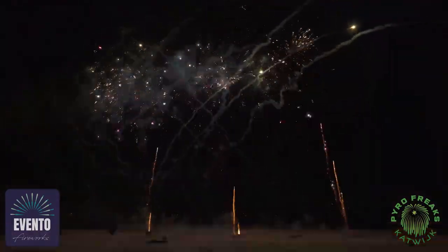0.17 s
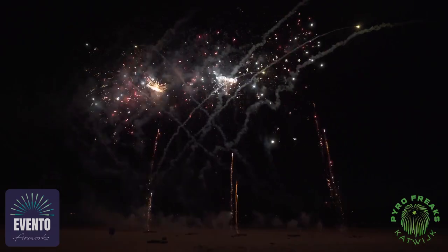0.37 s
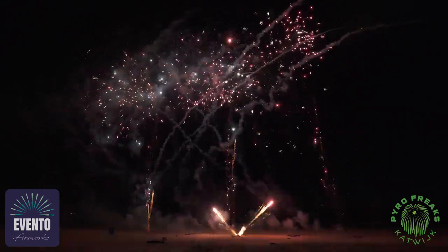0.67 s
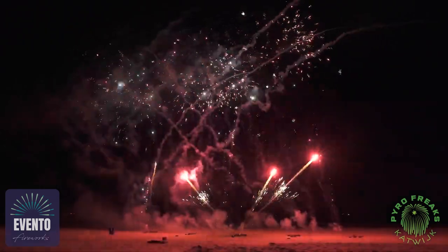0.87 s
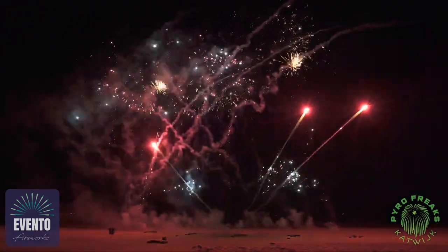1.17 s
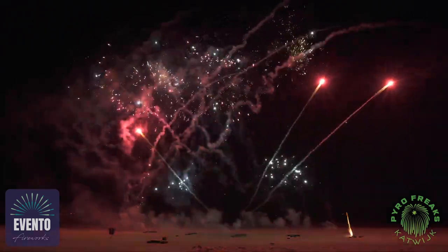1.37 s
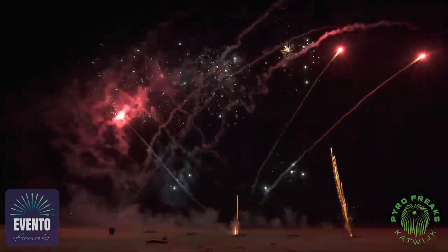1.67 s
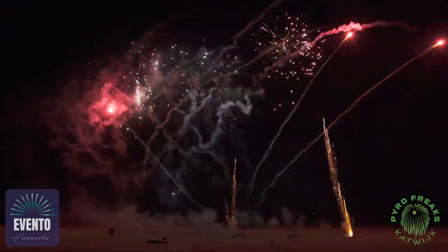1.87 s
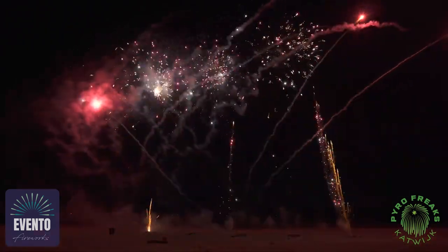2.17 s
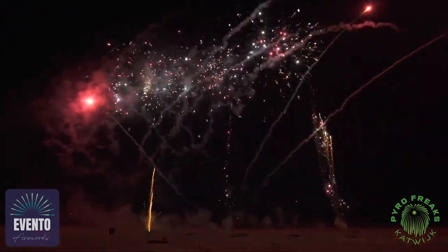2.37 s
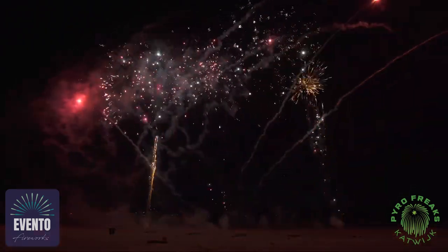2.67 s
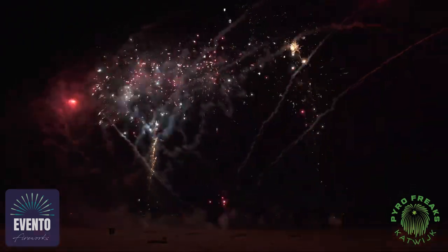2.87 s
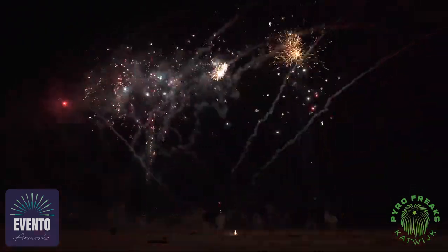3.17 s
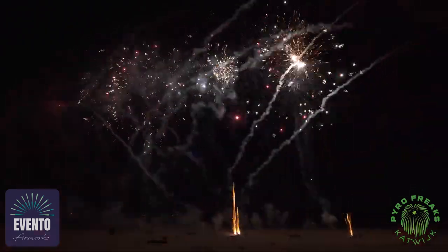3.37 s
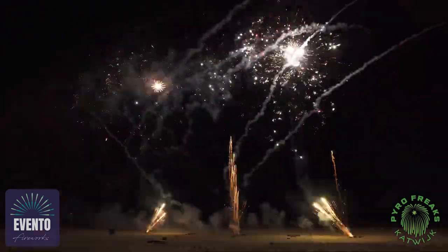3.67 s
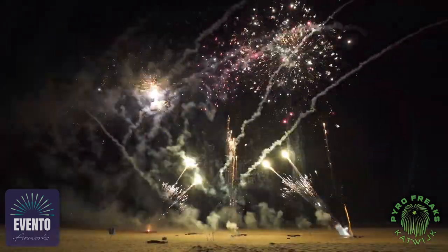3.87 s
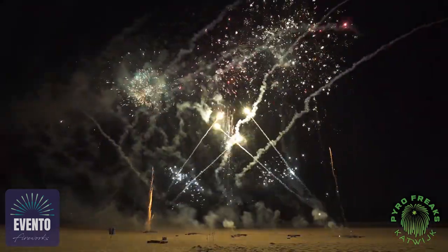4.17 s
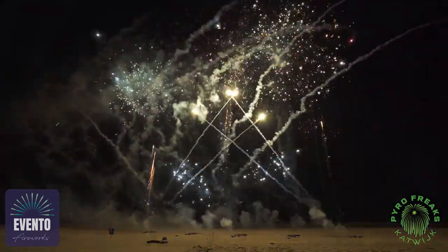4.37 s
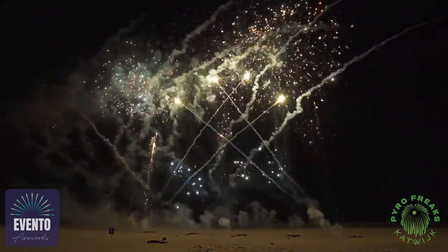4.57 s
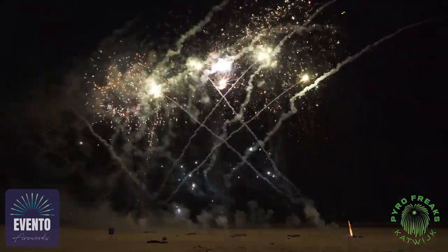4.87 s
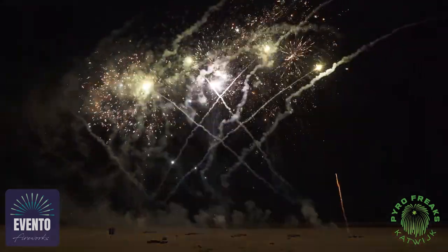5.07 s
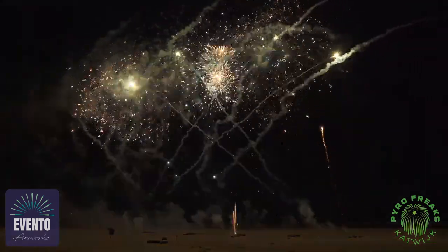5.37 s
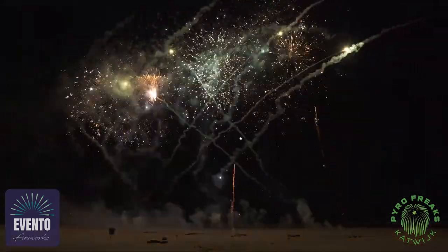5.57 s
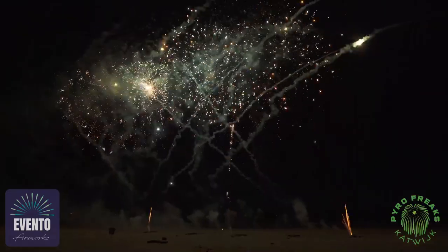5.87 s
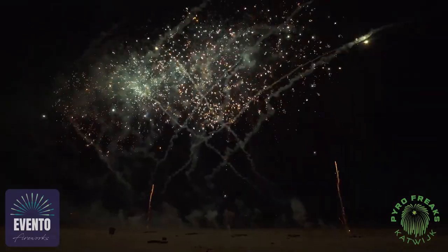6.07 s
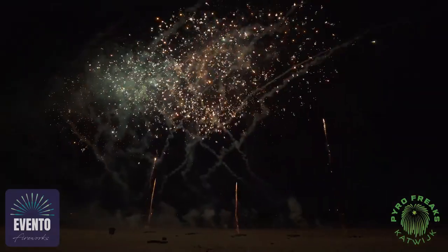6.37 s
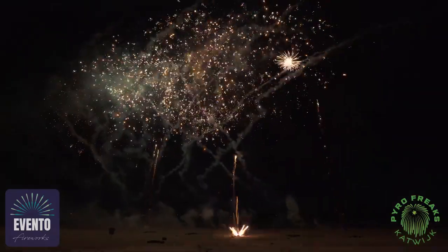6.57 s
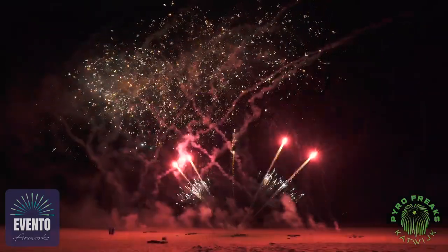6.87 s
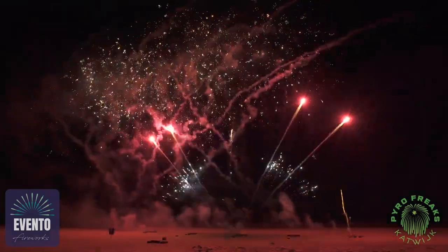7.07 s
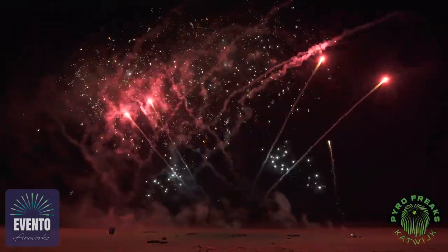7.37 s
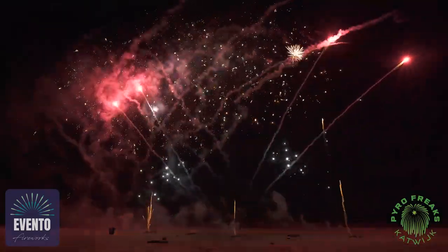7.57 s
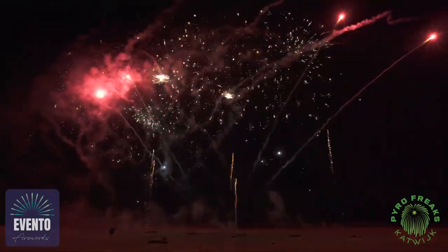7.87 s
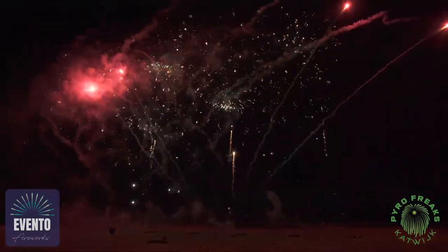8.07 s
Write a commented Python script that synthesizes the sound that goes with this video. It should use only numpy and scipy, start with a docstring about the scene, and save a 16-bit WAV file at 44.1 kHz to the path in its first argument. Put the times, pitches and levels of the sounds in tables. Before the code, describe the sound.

A night-time firework display outdoors, in wide stereo, begins over the fading roll of earlier shells. Three sharp bangs come within the first 0.25 s, then two near 0.5-0.65, with hollow tube thumps between. Ground mines crack and spit gas around 0.86-0.96. After a lull, bursts resume at 1.4 and scatter until 2.5, with runs of lift thumps. From 2.8, bangs on the right thicken into a dense barrage at 3.4-4.4, moving left, with loud mine cracks near 3.9. A lull follows until 5.06, then a rapid middle salvo shifts left and ends about 6.15. Mostly thumps and faint whistling remain until a loud burst and mines at 6.85-6.95. Another lull holds only soft thumps before bangs at 7.86, 7.92 and about 8.2. Each shock has a quick ground echo and long soft roll; faint fizz and air continue underneath.

```python
"""Sharp bangs of firework shells overhead come first, over the fading roll of earlier shells.
Each shell is a short shock wave, followed milliseconds later by its echo off the ground and scattered noise.
Three stations (left, middle, right) fire them: lift charges thump in their tubes, and mines crack and spit gas.
The surroundings return a long, soft roll. Sparks fizz and far whistles waver faintly in the night air.
"""
import sys
import numpy as np
from scipy import signal
from scipy.fft import rfft, irfft
from scipy.io import wavfile
from scipy.ndimage import uniform_filter1d

SR = 44100
rng = np.random.default_rng(int(sys.argv[2]) if len(sys.argv) > 2 else 0)


def bounce(signal):
    """Save signal as a 16-bit WAV file at the path given by the first command-line argument."""
    frames = np.transpose(np.atleast_2d(signal))
    limited = np.clip(frames, -1, 1)
    pcm = np.round(limited * 32767).astype(np.int16)
    wavfile.write(sys.argv[1], SR, pcm)


N = 363384
SIZE = 8192  # length of one short sound in samples
T = np.arange(SIZE) / SR  # time within a short sound, in seconds


def undb(db):
    """Turn decibels into a gain."""
    return 10 ** (np.asarray(db) / 20)


def add(track, start_s, sound):
    """Mix a stereo sound into the track at a time in seconds."""
    i = max(int(start_s * SR), 0)
    track[:, i:i + sound.shape[1]] += sound[:, :max(N - i, 0)]


def butter(x, hz, kind, order=2):
    """High-pass or low-pass filter that never acts before its input arrives."""
    sections = signal.butter(order, min(hz, SR / 2 - 1), kind, fs=SR, output="sos")
    return signal.sosfilt(sections, x)


def colour(x, points):
    """Shape the tone through (Hz, dB) points, without any sound ahead of its cause."""
    hz, db = np.transpose(points)
    bin_hz = np.arange(SIZE // 2 + 1) * SR / SIZE
    log_gain = np.interp(np.log(bin_hz + 1), np.log(hz), np.log(undb(db)))
    # folding the cepstrum forward in time makes the filter respond as early as it can
    cepstrum = irfft(log_gain)
    cepstrum[1:SIZE // 2] *= 2
    cepstrum[SIZE // 2 + 1:] = 0
    response = irfft(np.exp(rfft(cepstrum)))[:SIZE // 2]
    return signal.fftconvolve(x, response[None], axes=1)[:, :x.shape[1]]


def walk(rate_hz):
    """Slow random wander around zero: random steps at the given rate, smoothed twice."""
    step = int(SR / rate_hz)
    held = np.repeat(rng.standard_normal(N // step + 1), step)
    return uniform_filter1d(uniform_filter1d(held, step), step)[:N]


def grain(count, spread):
    """Noise made of separate reflections: each stretch of count samples has its own strength."""
    sizes = np.exp(spread * rng.standard_normal((2, SIZE // count + 1)))
    sizes = np.repeat(sizes, count, axis=1)[:, :SIZE] / np.exp(spread ** 2)
    return sizes * rng.standard_normal((2, SIZE))


def place(x, pan_db, front_hz=3400, leak=0.099):
    """Direction balances the body of a sound; its steep front reaches both channels in opposite phase."""
    body = butter(x, front_hz, "lowpass", order=1)
    front = x - body
    far = undb(-abs(pan_db)) - leak
    left, right = (1, far) if pan_db > 0 else (far, 1)
    return np.array([left * body - front, right * body + front])


# How wide diffuse sound is. Each row: frequency in Hz, gain of the channel difference in dB.
WIDTH = [(60, 10), (400, 11.5), (1500, 8), (4000, 8.5), (8000, 17), (13000, 22.5)]


def widen(x):
    """Spread diffuse sound wide: the channels are made to differ strongly, most of all in the treble."""
    mid = (x[0] + x[1]) / 2
    side = colour((x[:1] - x[1:]) / 2, WIDTH)[0]
    return np.array([mid + side, mid - side])


def whine(db=-57, pitch_hz=15734, throb_hz=11, depth=.4):
    """A thin, very high steady tone whose level is made to pulse quickly."""
    t = np.arange(N) / SR
    throb = 1 + depth * np.sin(2 * np.pi * throb_hz * t + .5 * walk(2))
    return undb(db) * throb * np.sin(2 * np.pi * pitch_hz * t)


# Tone of the outdoor air. Each row: frequency in Hz, gain in dB.
AIR_COLOUR = [(25, -1), (60, 13), (150, 17), (300, 2.5), (800, 9.5), (1500, 2.5), (3000, -21), (6000, -17),
              (10000, -31.5), (14000, -41)]


def night_air(db=-64):
    """A soft wash of outdoor noise, gently swelling; its level is set before widening."""
    air = colour(rng.standard_normal((2, N)), AIR_COLOUR)
    swell_db = 1.2 * walk(3)
    return air / air.std() * undb(db + swell_db)


# Tone of sound scattered by rough ground. Each row: frequency in Hz, gain in dB.
SCATTER_COLOUR = [(50, -16), (150, -3.5), (400, 2), (750, 1), (1200, -5), (2500, -10), (5000, -20),
                  (9000, -58), (14000, -40)]


def earlier_roll(db=-41, fade_s=0.054):
    """The roll of the shells that went off just before: fading noise."""
    wash = colour(rng.standard_normal((2, N)), SCATTER_COLOUR)
    fade = np.exp(-np.arange(N) / SR / fade_s)
    return wash / wash.std() * undb(db) * fade


# Faint far whistles. Each row: start in seconds, end in seconds, pitch at the start in Hz,
# pitch at the end in Hz, level in dB before flutter and widening.
WHISTLES = [(1.023, 1.364, 1153, 1030, -69.5), (6.197, 6.651, 845, 830, -63.5),
            (7.148, 7.723, 1078, 1047, -70)]


def whistles():
    """Thin, slightly wavering tones far off, arriving by several paths."""
    t, out = np.arange(N) / SR, np.zeros((2, N))
    for start_s, end_s, start_hz, end_hz, db in WHISTLES:
        part = np.clip((t - start_s) / (end_s - start_s), 0, 1)
        glide_hz = start_hz + (end_hz - start_hz) * part
        hz = glide_hz * (1 + 0.0033 * walk(60))
        # the right channel runs a quarter cycle ahead
        phase = 2 * np.pi * np.cumsum(hz) / SR + np.array([[0], [np.pi / 2]])
        flutter = undb(1.8 * np.array([walk(16), walk(25)]))
        rise_and_fall = 2 * np.sqrt(part * (1 - part))
        out += undb(db) * flutter * rise_and_fall * np.sin(phase)
    return out


# Tone of spitting gas and of sparks. Each row: frequency in Hz, gain in dB.
GAS_COLOUR = [(100, 1.5), (500, -7.5), (1500, 5.5), (3000, 5.5), (6000, -0.5), (10000, -11.5),
              (14000, -29.5)]


def sparks(db=-75, ticks_per_s=2500):
    """Burning stars fizz faintly overhead: a dense hiss of tiny ticks, a few of them larger."""
    fires = rng.random((2, N)) < ticks_per_s / SR
    sizes = undb(3.5 * np.minimum(rng.exponential(size=(2, N)), 6))
    ticks = colour(fires * sizes, GAS_COLOUR)
    return ticks / ticks.std() * undb(db + 2 * walk(2.2))


# Tone of the distant roll. Each row: frequency in Hz, gain in dB.
ROLL_COLOUR = [(30, -15), (100, -11.5), (250, -12), (500, -16.5), (800, -13.5), (1500, -12.5),
               (3000, -12.5), (6000, -25.5), (10000, -35), (14000, -31.5)]


def roll(x, t60_s=1.67, treble_t60_s=0.48, wet_db=-53):
    """Distant ground and buildings return a long, soft roll whose treble dies first."""
    t = np.arange(2 * SR) / SR
    noise = rng.standard_normal((2, len(t)))
    low = butter(noise, 2000, "lowpass", order=1)
    # each T60 is the time to fall by 60 dB
    tail = low * undb(-60 * t / t60_s) + (noise - low) * undb(-60 * t / treble_t60_s)
    # echoes build up quickly and come in uneven clumps
    build_up = (1 - np.exp(-t / 0.022)) * (1 + 5.0 * np.exp(-t / 0.023))
    clumps = undb(4.3 * walk(50)[:len(t)])
    response = colour(tail * build_up * clumps, ROLL_COLOUR)
    # both channels' sound returns from all round, whichever side fired
    from_left = signal.fftconvolve(x[:1], response, axes=1)
    from_right = signal.fftconvolve(x[1:], response[::-1] * np.array([[1], [-1]]), axes=1)
    return undb(wet_db) * (from_left + from_right)[:, :N]


def tube_thump(hz, damping):
    """Gas leaving a tube: a push, a suction and a small rebound."""
    cycles = hz * T
    return np.cos(2 * np.pi * cycles + damping / (2 * np.pi)) * np.exp(-damping * cycles)


# Lift charges, singly or in a run along the fuse. Each row: start in seconds,
# level in dB before the shaping of the shot, station, count of tubes.
CHARGES = [(0.175, -17.5, "right", 1), (0.279, -16.5, "right", 1), (0.4174, -21.5, "left", 1),
           (0.438, -20.5, "middle", 1), (0.7852, -22.5, "left", 1), (0.816, -20.5, "left", 1),
           (1.6055, -18, "right", 1), (1.6304, -21, "middle", 1), (1.67, -20, "right", 1),
           (1.6979, -17.5, "right", 4), (1.9462, -17, "middle", 1), (2.0988, -16.5, "right", 3),
           (2.3785, -21, "left", 1), (2.4457, -21.5, "left", 1), (2.5471, -22, "left", 3),
           (3.5182, -18.5, "middle", 1), (3.6073, -15.5, "right", 1), (3.753, -21, "middle", 1),
           (3.813, -22.5, "middle", 1), (4.0682, -17.5, "right", 1), (4.3409, -16, "left", 1),
           (4.3786, -20.5, "left", 1), (5.1337, -17.5, "right", 1), (6.0793, -19, "right", 1),
           (6.441, -19.5, "middle", 1), (6.4816, -19, "left", 1), (6.7195, -21.5, "middle", 1),
           (7.2036, -19, "right", 1), (7.6868, -19, "right", 1), (7.7349, -19, "right", 1),
           (7.7377, -17.5, "left", 1), (7.7977, -21.5, "left", 1), (7.905, -21.5, "middle", 1)]
# Faint lifts that patter on under thick salvos. Each row: start in seconds, end in seconds,
# level in dB before the shaping of the shot, station.
PATTER = [(3.57, 3.68, -22, "middle"), (4.281, 4.317, -24.5, "left")]


def lift_shots(fuse_s=.0435, patter_gap_s=0.015, patter_jitter_s=.002):
    """Every tube that fires: runs as the fuse burns from tube to tube, then the uneven patter."""
    shots = []
    for start_s, db, station, count in CHARGES:
        for k in range(count):
            shots.append((start_s + k * fuse_s, db, station))
    for start_s, end_s, db, station in PATTER:
        for s in np.arange(start_s, end_s, patter_gap_s):
            shots.append((s + patter_jitter_s * rng.standard_normal(), db, station))
    return shots


# The three firing positions. Each entry: left minus right in dB before leak and side adjustments,
# typical delay of the ground echo in milliseconds, typical pitch of the lift tube in Hz.
STATIONS = {"left": (8.1, 6.25, 200), "middle": (-4.5, 7.2, 193), "right": (-17, 7.45, 232)}


def lifts(damping=1.56, round_hz=600, thump_db=-1.5, crack_db=-2, spit_db=-15, tail_db=-35,
          wider=2.0, tube_spread=.06):
    """A small crack at the muzzle, a hollow thump and a spit of gas, further to the side than the burst."""
    thumps, spits = np.zeros((2, N)), np.zeros((2, N))
    for s, db, station in lift_shots():
        pan_db, _, tube_hz = STATIONS[station]
        hz = tube_hz * np.exp(tube_spread * rng.standard_normal())  # pitch differs from shot to shot
        thump = butter(tube_thump(hz, damping), round_hz, "lowpass", order=1)
        crack = np.exp(-T / .00005)
        wave = undb(thump_db) * thump + undb(crack_db) * crack
        add(thumps, s, undb(db) * place(wave, wider * pan_db))
        gas = undb(spit_db) * np.exp(-T / 0.0015) + undb(tail_db) * np.exp(-T / .015)
        add(spits, s, undb(db) * gas * rng.standard_normal((2, SIZE)))
    return thumps + widen(colour(spits, GAS_COLOUR))


# Mines throwing stars from the ground. Each row: start in seconds, level of the shot in dB
# before its shaping, station, level of the gas rush in dB before its shaping.
STAR_MINES = [(0.8586, -11, "middle", -20.5), (0.953, -21.5, "middle", -26), (0.9566, -11, "middle", -19.5),
              (3.473, -21.5, "left", -28), (3.8682, -10.5, "right", -25), (3.8711, -7.5, "right", -24.5),
              (3.9117, -14.5, "left", -28), (3.9199, -14, "left", -27.5), (6.8545, -15.5, "middle", -25.5),
              (6.8594, -9, "middle", -16.5)]


def mine_gas(rush_s=.0026, fizz_db=-20, fizz_s=0.009, stars_db=-37, ragged=.85):
    """A ragged rush of gas leaves each mine, fizzes briefly and ends in the hiss of its rising stars."""
    gas = np.zeros((2, N))
    lead_s = 0.0016  # gas already leaks just ahead of the crack
    rush = np.exp(-abs(T - lead_s) / rush_s)
    fizz = undb(fizz_db) * np.exp(-T / fizz_s)
    stars = undb(stars_db) * (1 - T / T[-1])
    for s, _, _, rush_db in STAR_MINES:
        ragged_noise = grain(count=16, spread=ragged)
        add(gas, s - lead_s, undb(rush_db) * (rush + fizz + stars) * ragged_noise)
    return widen(colour(gas, GAS_COLOUR))


def mines(tube_hz=110, damping=1.8, thump_db=-7, crack_db=0, echo_s=.0125, echo_db=-15):
    """A wide tube gives a deep, dead thump behind a sharp crack, and a weak slap off something near."""
    thumps = np.zeros((2, N))
    thump = butter(tube_thump(tube_hz, damping), 43, "highpass")
    crack = np.exp(-T / .00005)
    wave = undb(thump_db) * thump + undb(crack_db) * crack
    for s, db, station, _ in STAR_MINES:
        shot = place(wave, STATIONS[station][0])
        add(thumps, s, undb(db) * shot)
        add(thumps, s + echo_s, undb(db + echo_db) * shot)
    return thumps


def blast(push_ms, relax, low_hz):
    """Blast wave: an instant rise, a short push, then a longer suction; the deepest bass is lost."""
    age = T * 1000 / push_ms
    return butter((1 - age) * np.exp(-relax * age), low_hz, "highpass")


# Tone of the shock waves. Each row: frequency in Hz, gain in dB.
SHOCK_COLOUR = [(40, 3), (150, 1), (300, 2), (550, 5.5), (1000, 0), (2000, 2), (4000, 1), (8000, 7.5),
                (11000, 2), (14000, 5.5), (16500, 2)]
# Shells bursting overhead, singly and in salvos. Each row: start in seconds,
# level in dB before the shaping of the burst, station.
SHELLS = [(0.0816, 0, "left"), (0.1293, 0, "right"), (0.2207, 0, "middle"), (0.5204, -1.5, "middle"),
          (0.6538, -1, "left"), (1.393, 1, "right"), (1.4735, -1, "left"), (1.7182, 0, "middle"),
          (1.9645, 2, "right"), (2.0457, -1, "left"), (2.218, -0.5, "middle"), (2.343, -2, "left"),
          (2.5017, -2, "left"), (2.8406, 2.5, "right"), (3.1446, 2.5, "right"), (3.176, 1, "right"),
          (3.3971, 3.5, "right"), (3.4019, 1, "right"), (3.4439, -0.5, "middle"), (3.449, 2, "right"),
          (3.4805, -3.5, "middle"), (3.5435, 2.5, "right"), (3.6848, 3.5, "right"), (3.7015, 2, "right"),
          (3.7817, 1, "right"), (3.9596, 2, "right"), (3.9941, 1.5, "right"), (4.0062, -3.5, "left"),
          (4.112, -0.5, "left"), (4.1551, -4.5, "left"), (4.1594, -0.5, "left"), (4.1886, -0.5, "left"),
          (4.2439, -0.5, "left"), (4.3938, -1, "left"), (5.0631, 0.5, "middle"), (5.1555, 0, "middle"),
          (5.1893, -2.5, "middle"), (5.211, 1.5, "middle"), (5.226, -0.5, "middle"),
          (5.382, -0.5, "middle"), (5.396, -0.5, "middle"), (5.4216, -2, "middle"), (5.448, 0.5, "middle"),
          (5.5005, -0.5, "middle"), (5.5605, -2, "middle"), (5.5651, 0, "middle"), (5.6106, -1, "middle"),
          (5.7331, 2, "right"), (5.7773, -0.5, "left"), (5.8003, -1.5, "left"), (5.9008, -0.5, "left"),
          (5.9183, -1.5, "left"), (5.9724, -1.5, "left"), (6.0313, 0.5, "left"), (6.1515, -0.5, "left"),
          (6.8395, 3.5, "right"), (6.9342, 0.5, "middle"), (7.8606, 1.5, "right"), (7.9167, -0.5, "left"),
          (8.1781, 0.5, "middle"), (8.1955, -1, "left")]


def bursts(push_ms=0.68, push_spread=0.057, relax=0.89, low_hz=170, echo_db=-6.5, echo_hz=3300,
           echo_spread_ms=.12, ripple_db=-24, near_db=-23, scatter_db=-15, lumpy=.5):
    """Each shell sends a shock, its duller twin off the ground, and a spray of small reflections."""
    shocks, spray = np.zeros((2, N)), np.zeros((2, N))
    for s, db, station in SHELLS:
        pan_db, echo_ms, _ = STATIONS[station]
        shell_push_ms = push_ms * np.exp(push_spread * rng.standard_normal())
        wave = undb(db) * blast(shell_push_ms, relax, low_hz)
        # turbulent air wrinkles the wave just behind its front
        wrinkles = butter(rng.standard_normal((4, SIZE)), 2300, "lowpass", order=1)
        ripple = undb(db + ripple_db) * np.exp(-T / 0.0026) * wrinkles
        add(shocks, s, place(wave, pan_db) + ripple[:2])
        ground = place(butter(wave, echo_hz, "lowpass", order=1), 0.9 * pan_db) + ripple[2:]
        # shells burst at slightly different heights, so the echo delay varies
        echo_s = s + (echo_ms + echo_spread_ms * rng.standard_normal()) / 1000
        add(shocks, echo_s, undb(echo_db) * ground)
        # things close by reflect at once; rough ground goes on reflecting from ever further away
        near_fade = np.exp(-T / 0.0055)
        add(spray, s, undb(db + near_db) * near_fade * rng.standard_normal((2, SIZE)))
        ground_fade = np.exp(-T / 0.073) / (1 + T / 0.0023) ** 0.7
        add(spray, echo_s, undb(db + scatter_db) * ground_fade * grain(count=48, spread=lumpy))
    return colour(shocks, SHOCK_COLOUR) + widen(colour(spray, SCATTER_COLOUR))


def scene():
    """All the fireworks, their roll and the night air."""
    shots = bursts() + lifts() + mines()
    surroundings = roll(shots) + earlier_roll() + sparks() + whistles() + night_air()
    return shots + mine_gas() + widen(surroundings)


def record(dry, top_hz=16500):
    """Adds the thin high tone, clips the tallest fronts and cuts the highest treble."""
    clipped = np.clip(dry + whine(), -.92, .92)
    low_pass = signal.firwin(161, top_hz, window=("kaiser", 8), fs=SR)
    return signal.fftconvolve(clipped, low_pass[None], mode="same", axes=1)


dry = scene()
out = record(dry)
bounce(out)
```